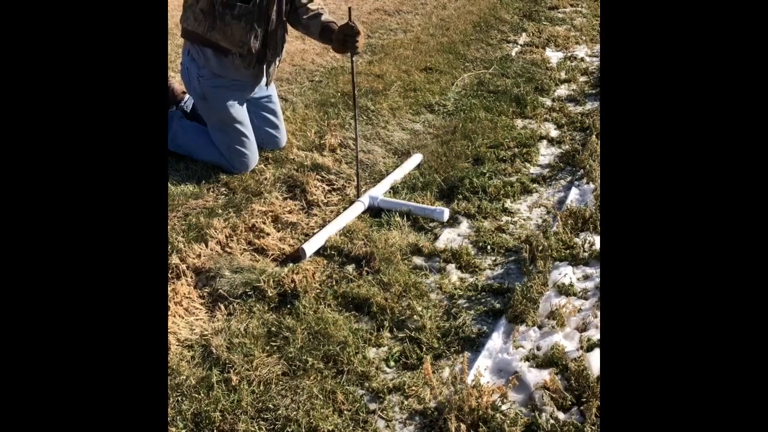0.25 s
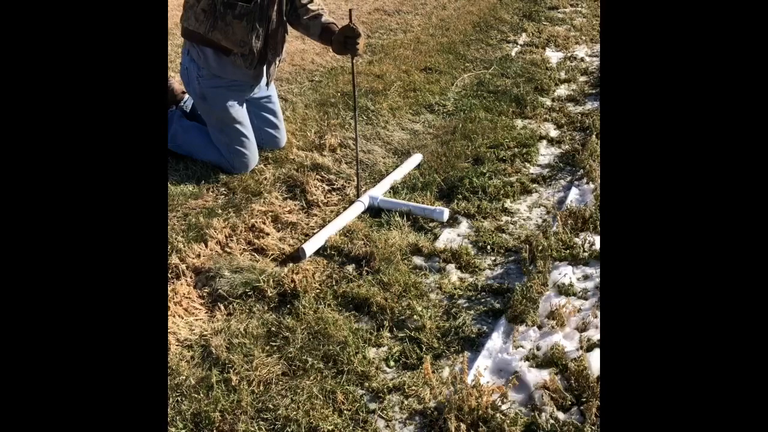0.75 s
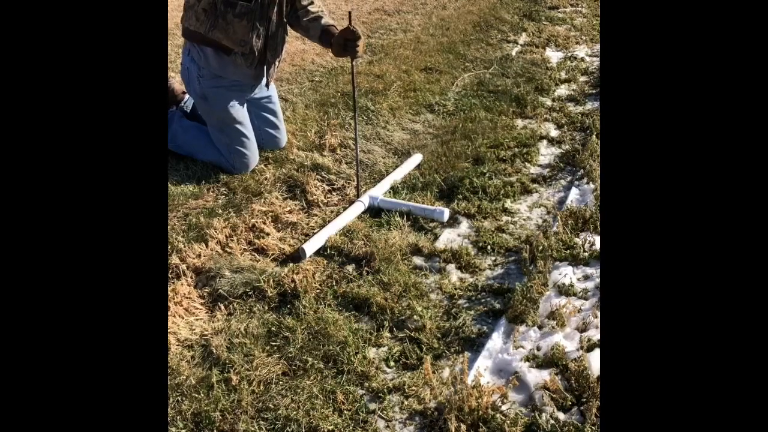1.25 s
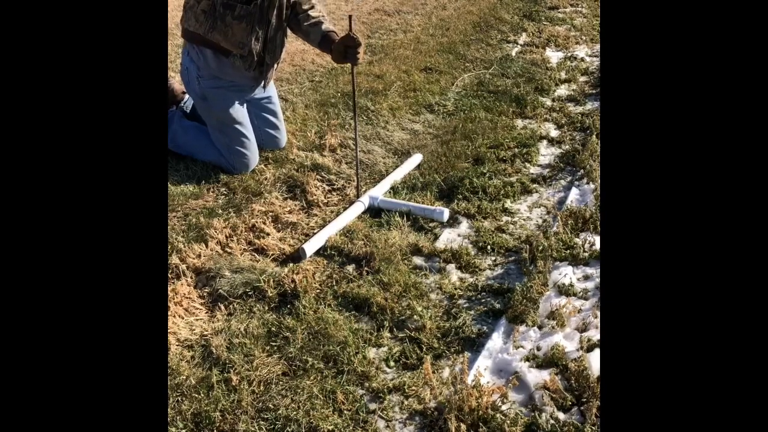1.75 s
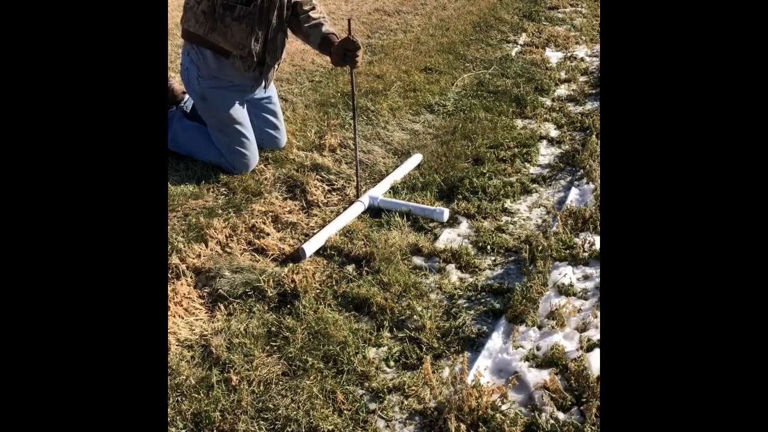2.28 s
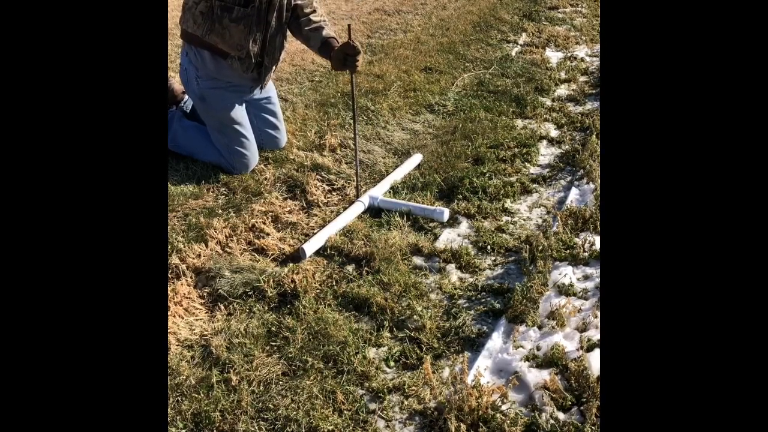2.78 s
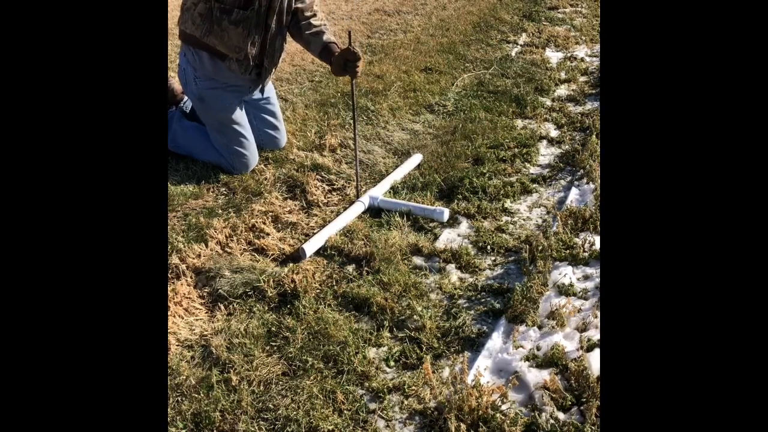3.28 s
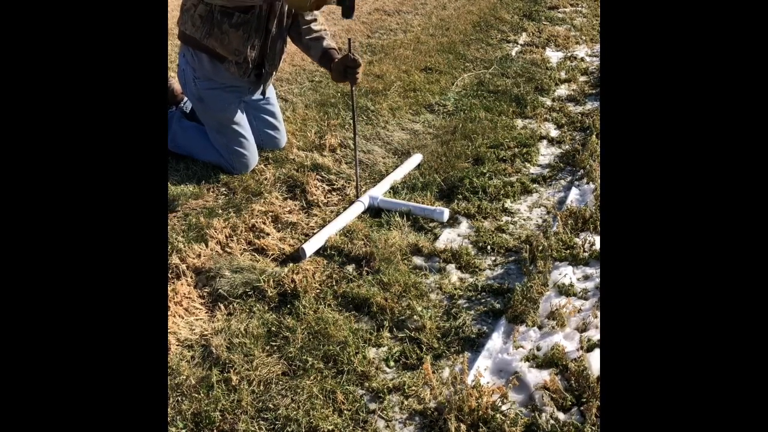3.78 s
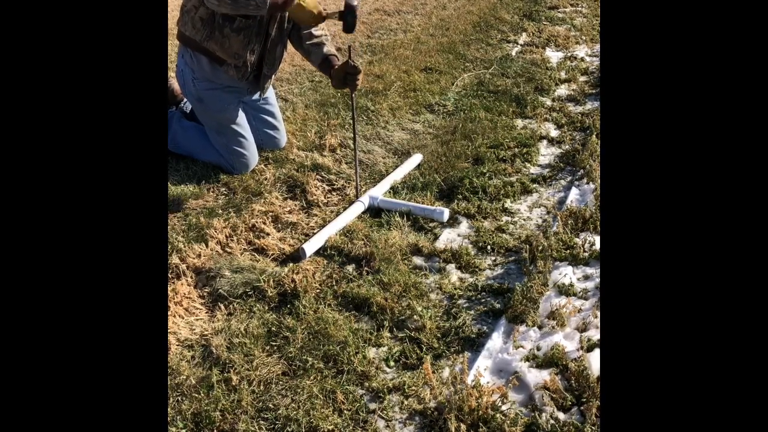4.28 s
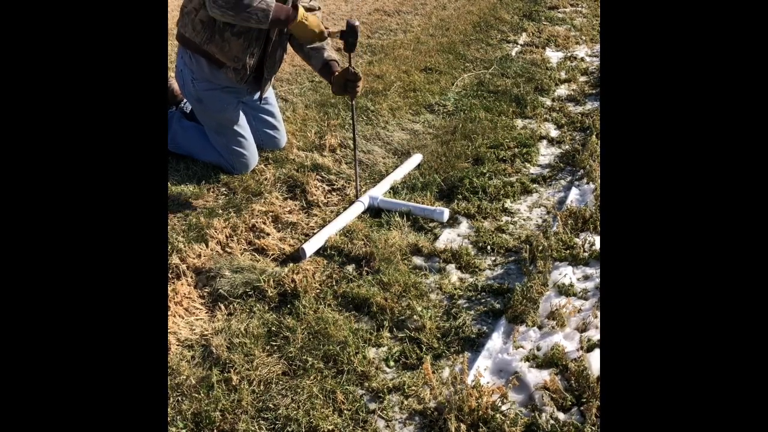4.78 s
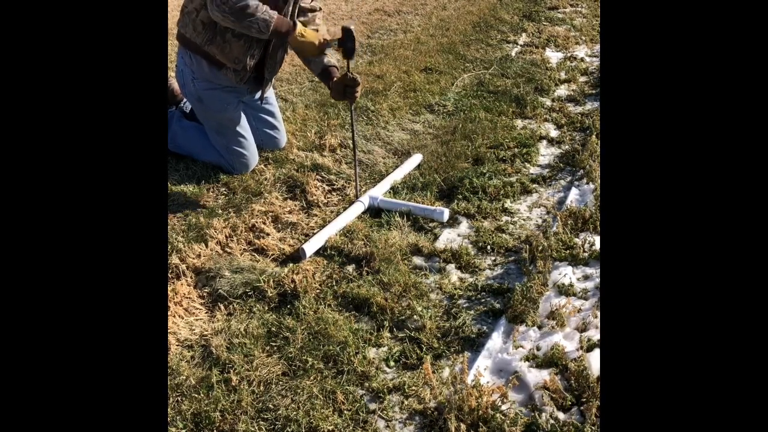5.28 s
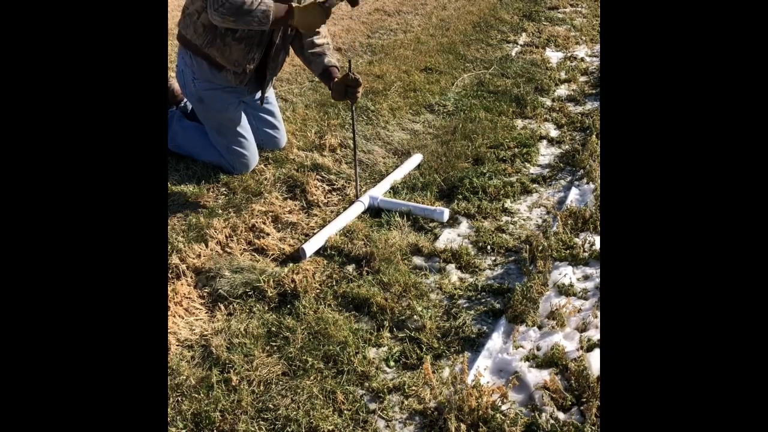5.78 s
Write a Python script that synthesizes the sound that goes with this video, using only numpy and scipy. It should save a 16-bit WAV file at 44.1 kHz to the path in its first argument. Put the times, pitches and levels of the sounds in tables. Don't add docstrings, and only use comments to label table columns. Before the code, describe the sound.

Sharp steel-on-steel hammer strikes, about two per second, clank and die quickly over quiet open yard air with faint grass ticks.

```python
import sys
import numpy as np
from scipy import signal
from scipy.io import wavfile
from scipy.ndimage import uniform_filter1d

SR = 44100
rng = np.random.default_rng(int(sys.argv[2]) if len(sys.argv) > 2 else 0)


def to_wav(sig):
    pcm = np.clip(np.atleast_2d(sig), -1, 1) * 32767
    pcm = np.round(pcm).astype(np.int16)
    wavfile.write(sys.argv[1], SR, pcm.T)


def how_loud(loudness_db):
    steps = np.asarray(loudness_db, float) / 20
    return 10 ** steps


N = 266805

# (time [s], peak [dB], slide length [s], scrape level [dB],
# damping by soil and glove once the stake stops [dB/ms])
HAMMER_BLOWS = [(0.2972, 1, 0.0059, -17.5, 2.1), (0.8407, 2, 0.0075, -22, 1.5),
                (1.3905, 3, 0.0079, -18, 0.7), (1.935, 1.5, 0.0099, -18, 1.57),
                (2.4781, -0.5, .019, -26.5, 5), (3.0348, .5, 0.02, -25.5, 1), (3.5906, 1, 0.019, -27, 0.8),
                (4.1401, 0, .0211, -24, 0.5), (4.6892, 1, 0.021, -26, 1.2), (5.253, 2, 0.02, -27.5, 3),
                (5.8277, 1.5, 0.018, -24.5, 4)]


def evened(x):
    return x / np.sqrt(np.mean(x ** 2) + 1e-20)


def add(mix, s, sound):
    part = mix[round(s * SR):][:len(sound)]
    part += sound[:len(part)]


def colour(x, points):
    f, db = np.transpose(points)
    hz = abs(np.fft.fftfreq(4096, 1 / SR))
    log_gain = np.log(how_loud(np.interp(np.log(hz + 1), np.log(f + 1), db)))
    taps = np.fft.ifft(np.exp(np.conj(signal.hilbert(log_gain)))).real[:2048]
    return signal.oaconvolve(x, taps / np.linalg.norm(taps))[:len(x)]


def band(x, lo_hz, hi_hz):
    sos = signal.butter(2, [lo_hz, min(hi_hz, SR / 2.2)], "band", fs=SR, output="sos")
    return signal.sosfilt(sos, x)


def ring(hz, t60, rise, glide=0., size=6000):
    t = np.arange(size) / SR
    turns = np.cumsum(hz * np.exp(-glide * t)) / SR
    return how_loud(-60 * t / t60) * (1 - np.exp(-t / rise)) * np.sin(2 * np.pi * turns)


def air():
    # (frequency [Hz], level [dB per Hz])
    floor = [(12, -67.5), (20, -28), (37, -11), (75, -3), (109, -0.5), (181, -16), (293, -16), (328, -21),
             (367, -16.5), (530, -18.5), (1640, -33), (2370, -35), (5860, -38.5), (14500, -42),
             (17100, -57.5)]
    # (time [s], level [dB])
    breeze_path = [
        (0, -.2),
        (1.2, -0.2),
        (3.5, -2.04),
        (5.6, 0.45),
    ]
    frames, hz = N // 256 + 5, np.fft.rfftfreq(1024, 1 / SR)
    real, imag, patches = rng.standard_normal((frames, 513, 3)).T
    patches = evened(uniform_filter1d(uniform_filter1d(patches, 12, 0), 14, 1))
    f, db = np.transpose(floor)
    floor_db = np.interp(np.log(hz + 1), np.log(f + 1), db)[:, None]
    breeze_db = np.interp(np.arange(frames) * 256 / SR, *np.transpose(breeze_path))
    field_db = floor_db + 0.4 * patches + breeze_db / (1 + (hz[:, None] / 400) ** 2)
    noise = signal.istft((real + 1j * imag) * how_loud(field_db), nperseg=1024, noverlap=768)[1][:N]
    return how_loud(-62.5) * evened(noise)


def grass_ticks():
    # (time [s], level [dB], lowest frequency [Hz])
    ticks = [(0.014, -59, 6000), (.085, -75, 9000), (.4024, -67, 8000), (.4618, -62, 7900),
             (.4888, -62, 8000), (.508, -60, 9000), (.595, -57, 8000), (1.0293, -64, 8000),
             (1.136, -57, 7000), (2.6333, -66, 8000), (3.7291, -59, 6930), (3.764, -65, 8000),
             (3.7915, -68.5, 8950), (3.8317, -61, 7000), (4.2579, -57, 9250), (5.9932, -71, 5830),
             (6.0136, -54.5, 7000)]
    out, t = np.zeros(N), np.arange(150) / SR
    for s, db, hz in ticks:
        grit = rng.standard_normal(150)
        add(out, s, how_loud(db) * band(grit * np.exp(-t / 0.0017), hz, 16000))
    return out


def contact():
    # (first flight [s], second flight [share of first],
    # level [dB], change per rebound [dB])
    rebounds = [
        (.0056, 1.14, -7.5, -4.5),
        (.0086, .51, -7.5, -4.5),
        (.0085, .69, -11, -1.1),
        (.01, 0.45, -8.5, 0.15),
        (.0097, .55, -10, 1.54),
        (.0082, 0.76, -11, 0.8),
        (.0071, .69, -12, 1.3),
    ]
    # (time [s], level [dB])
    slaps = [
        (.8616, -35),
        (.8665, -35.5),
        (1.403, -20.5),
        (1.4184, -30.5),
        (1.9566, -33),
        (2.5006, -33.5),
        (3.062, -45.5),
        (3.615, -34),
        (5.2808, -41),
        (5.8504, -35.5),
    ]
    force, faint, slide = np.zeros(N), np.zeros(N), np.zeros(N)
    for (s, *_), (flight, share, db, change_db) in zip(HAMMER_BLOWS[4:], rebounds):
        second = flight * share
        third = second * .8
        for k, after in enumerate(np.cumsum([flight, second, third])):
            add(force, s + after - .0004, how_loud([db + k * change_db]))
    for s, db in slaps:
        add(faint, s, how_loud([db]))
        add(faint, s + .0045, how_loud([db - 12]))
    for s, db, length, scrape_db, _ in HAMMER_BLOWS:
        add(force, s - .0004, how_loud([db]))
        add(force, s - .0014, how_loud([db - 8]))
        add(slide, s + 0.0014, how_loud(scrape_db) * signal.windows.tukey(round(length * SR), .2))
    grains = rng.standard_normal(N) * how_loud(3.5 * rng.exponential(1, N).clip(0, 4))
    return force + how_loud(-16.5) * slide * evened(grains), faint, slide


def stake(force, faint):
    modes_hz = [770, 1390, 2290, 2930, 3470, 4230, 4920, 5740, 6590, 7410, 8315, 9345, 10330, 11385, 12485,
                13640, 14790, 15620]
    # (width [Hz], level [dB])
    mode_shapes = [(180, -17), (150, -17), (150, -10), (150, -13), (150, -9), (150, -9.5), (170, -7),
                   (200, -10.5), (139, -13), (150, -1.5), (120, -8), (273, -0.5), (120, 1), (159, -3.5),
                   (120, -1), (120, -10.5), (140, -10), (170, -22)]
    # (frequency [Hz], level [dB])
    crack_colour = [(200, -33.5), (600, -12), (1100, -7.5), (2000, -8), (5000, -3), (7000, -5), (10000, 1),
                    (14000, -5.5), (16500, -10)]
    # (group centre [Hz], group lift [dB], others' shift [dB])
    face_hits = [(705, 4.5, 0.44), (700, 3.5, -0.5), (1300, 2.5, 1.1), (2300, -8, 4), (1492, -2.5, 1),
                 (700, 1.5, -0.15), (2500, 4, 1.4), (7000, 3.5, -0.16), (7000, 1.5, 0.6), (700, 3, .9),
                 (700, 3.5, 0.4)]
    # (time [s], level [dB], frequency [Hz], t60 [s])
    lingering = [
        (3.059, -69, 5740, 0.23),
        (3.611, -55, 4920, 0.16),
        (5.851, -56.5, 4230, 0.059),
    ]
    out, t, grid_hz = np.zeros(N), np.arange(2000) / SR, np.geomspace(300, 17000, 40)
    for (s, _, length, _, grip_db), (group_hz, lift_db, others_db) in zip(HAMMER_BLOWS, face_hits):
        group = np.exp(-(np.log2(grid_hz / group_hz) / .45) ** 2)
        strongest = np.exp(-(np.log2(grid_hz / 10100) / .25) ** 2)
        tint_db = lift_db * group + others_db * (1 - strongest)
        tint = np.transpose([grid_hz, tint_db])
        mode_db = np.interp(np.log(modes_hz), np.log(grid_hz), tint_db)

        modes = np.zeros(2000)
        signs = rng.choice([-1, 1], len(modes_hz))
        for hz, (width_hz, db), extra_db, sign in zip(modes_hz, mode_shapes, mode_db, signs):
            modes += sign * how_loud(db + extra_db) * ring(hz, 1.6 / width_hz, .0003, size=2000)

        hiss = rng.standard_normal(2000) * how_loud(-60 * t / 0.032 - 6) * (1 - np.exp(-t / 0.00039))
        hiss[0] = how_loud(9)
        hiss = colour(colour(hiss, crack_colour), tint) * np.sqrt(np.mean(how_loud(mode_db) ** 2))

        near = slice(round((s - .002) * SR), round((s + .05) * SR))
        ringing = how_loud(-9) * signal.oaconvolve(force[near], modes)
        crack = how_loud(-10.5) * signal.oaconvolve(force[near], hiss)
        late_slaps = how_loud(-7.5) * signal.oaconvolve(faint[near], hiss)
        held_ms = 1000 * np.clip(np.arange(len(crack)) / SR - length - .004, 0, 1)
        grip = how_loud(-abs(grip_db) * held_ms)
        add(out, s - .002, grip * (ringing + crack) + late_slaps)
        hard_knocks = np.maximum(force[near] - .15, 0)
        add(out, s - .002, yard(colour(hard_knocks, crack_colour)))
    for s, db, hz, t60 in lingering:
        add(out, s, how_loud(db) * ring(hz, t60, .003))
    return out


def yard(x):
    # (frequency [Hz], level [dB])
    scatter_colour = [(300, 11), (1000, 9), (2500, 3.5), (5000, -1.5), (8000, -2.5), (11000, -5),
                      (16500, -1)]
    t = np.arange(4000) / SR
    taps = rng.standard_normal(4000) * (rng.random(4000) < .3)
    wash = how_loud(-45.5 - 60 * t / 0.15) * (1 - np.exp(-t / 0.0044))
    spread = how_loud(-62.5) / (1 + np.exp((t - .064) / 0.0014)) + how_loud(-77.0 - 60 * t / .4)
    return how_loud(4.0) * signal.oaconvolve(x, colour(taps * (wash + spread), scatter_colour))


def soil(slide):
    # (time [s], thud level [dB], thud pitch [Hz], grit spray level [dB])
    stops = [(0.2981, -19.5, 324.6, -39), (0.843, -27.5, 330, -39), (1.393, -21.5, 270.5, -42),
             (1.937, -27.5, 299.6, -39), (2.493, -31.5, 300, -47), (3.051, -29, 247, -47),
             (3.607, -35, 299.3, -46), (4.159, -31, 250, -44), (4.709, -34, 200, -49),
             (5.27, -36.5, 300, -46.5), (5.839, -30.5, 170, -48.5)]
    # (time [s], level [dB], centre [Hz])
    clods = [
        (.86, -42.5, 912),
        (.881, -39, 784),
    ]
    t = np.arange(4000) / SR
    drag = signal.lfilter([.006], [1, -.994], slide)
    out = how_loud(-1.5) * band(drag * rng.standard_normal(N), 85, 1800)
    for s, db, hz in clods:
        knock = evened(band(rng.standard_normal(4000), hz * .6, hz * 1.5))
        add(out, s, how_loud(db - 60 * t / .02) * knock)
    for s, thud_db, thud_hz, spray_db in stops:
        heave_db = -41 + 17 * np.exp(-s / 1.5)
        loose, grit = rng.standard_normal((2, 4000))
        add(out, s, how_loud(thud_db) * ring(thud_hz, 0.026, 0.00031, glide=59))
        add(out, s + 0.0092, how_loud(heave_db) * ring(110, 0.13, 0.0014, glide=1.1))
        rumble = evened(band(loose, 35, 250)) * (1 - np.exp(-t / 0.0016))
        add(out, s + .003, how_loud(heave_db - 8.5 - 60 * t / 0.18) * rumble)
        spray_swell = (t / 0.0078) ** 2 * np.exp(2 - 2 * t / .007)
        add(out, s + 0.011, how_loud(spray_db - 2.5) * evened(band(grit, 3800, 14000)) * spray_swell)
    return out


def sleeve_rustle():
    # (time [s], length [s], level [dB])
    swells = [
        (4.801, .12, -77),
        (4.98, .14, -85),
        (5.33, 0.32, -76.5),
        (5.67, .07, -86),
    ]
    out, t = np.zeros(N), np.arange(N) / SR
    grains = rng.standard_normal(N) * how_loud(2.4 * rng.exponential(1, N))
    cloth = evened(band(grains, 1500, 5700))
    for s, length, db in swells:
        out += cloth * how_loud(db) * np.sin(np.pi * np.clip((t - s) / length, 0, 1))
    return out


def wind_bumps():
    # (time [s], level [dB], start pitch [Hz], length [s])
    bumps = [
        (5.402, -40, 170, 0.036),
        (5.436, -48, 99, 0.069),
        (5.466, -44.5, 170, 0.038),
        (5.529, -48, 180, 0.021),
        (5.57, -44.5, 150, 0.044),
        (5.615, -56.5, 150, 0.045),
    ]
    out = np.zeros(N)
    for s, db, hz, length in bumps:
        add(out, s, how_loud(db) * ring(hz, 3 * length, 0.15 * length, glide=36.3) * 2)
    return out


def scene():
    force, faint, slide = contact()
    blows = stake(force, faint) + soil(slide)
    small_sounds = grass_ticks() + sleeve_rustle() + wind_bumps()
    return (air() + blows + small_sounds)[None]


def top_cut(x):
    return signal.sosfilt(signal.butter(12, 17290, fs=SR, output="sos"), x)


def record(dry):
    leads = [1024, 864, 704, 512, 352]
    lead_levels = [-43, -48.5, -54, -49.5, -54.5]
    dry = signal.sosfilt(signal.butter(3, 36, "high", fs=SR, output="sos"), dry)
    treble = band(dry, 1500, 15500)
    ahead = sum(how_loud(db) * np.roll(treble, -lead, axis=1) for lead, db in zip(leads, lead_levels))
    limited = 1.2 * np.tanh((dry + ahead) / 1.2)
    edge = signal.firwin(101, 15900, window=("kaiser", 5), fs=SR)[None]
    return top_cut(signal.oaconvolve(limited, edge, "same"))


dry = scene()
out = record(dry)
to_wav(out)
```